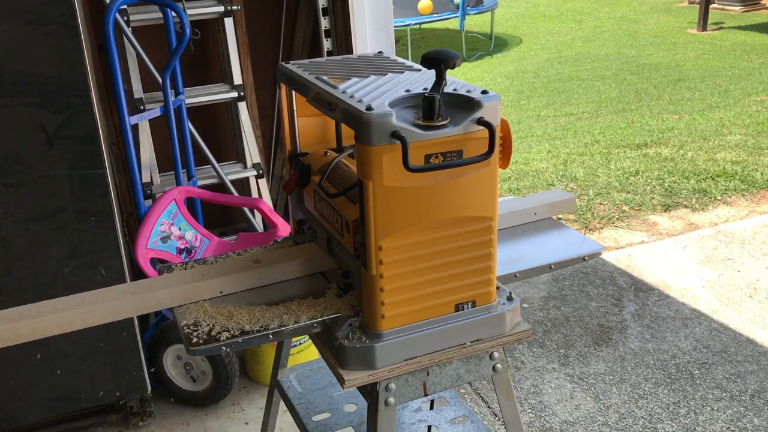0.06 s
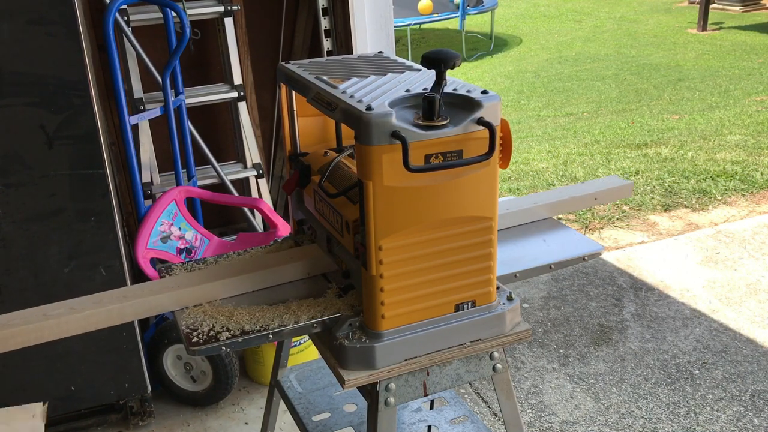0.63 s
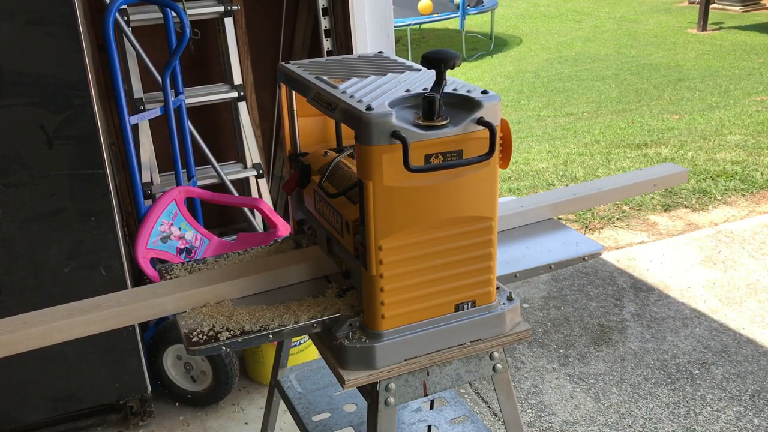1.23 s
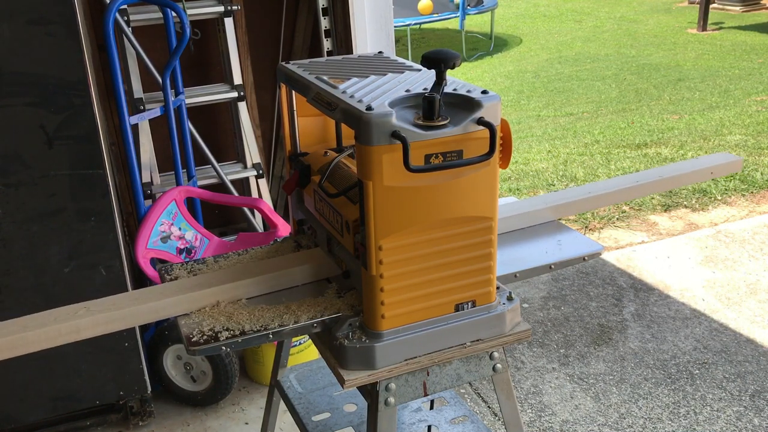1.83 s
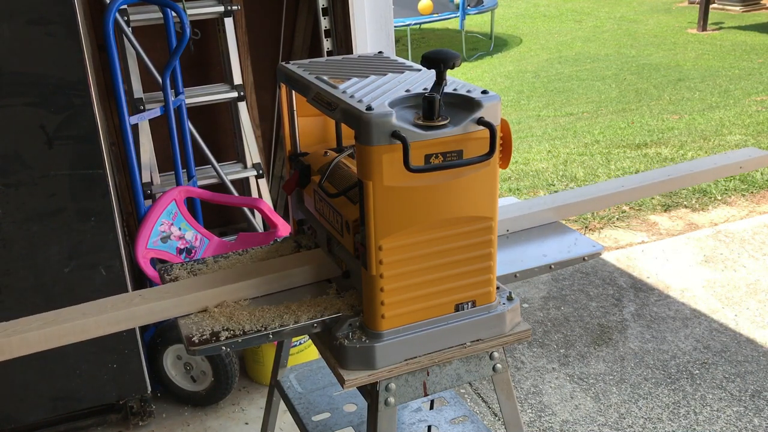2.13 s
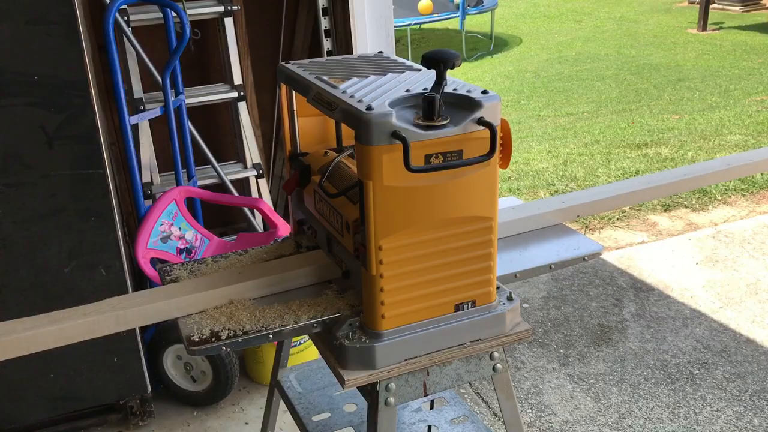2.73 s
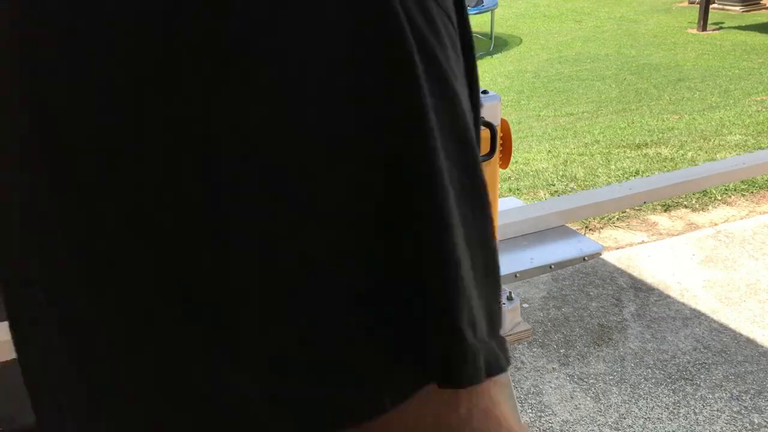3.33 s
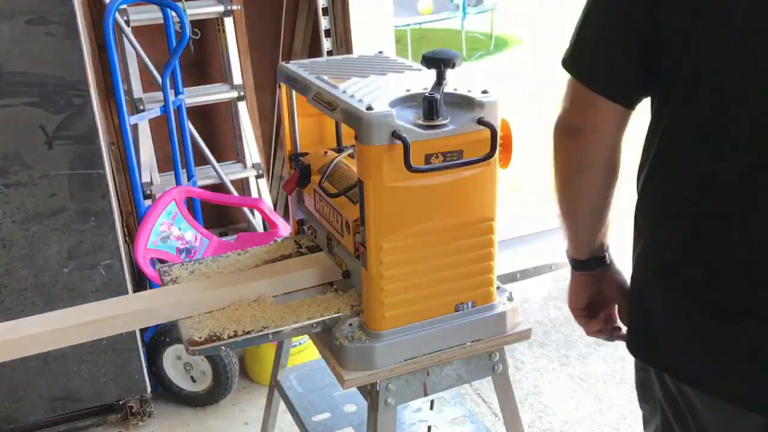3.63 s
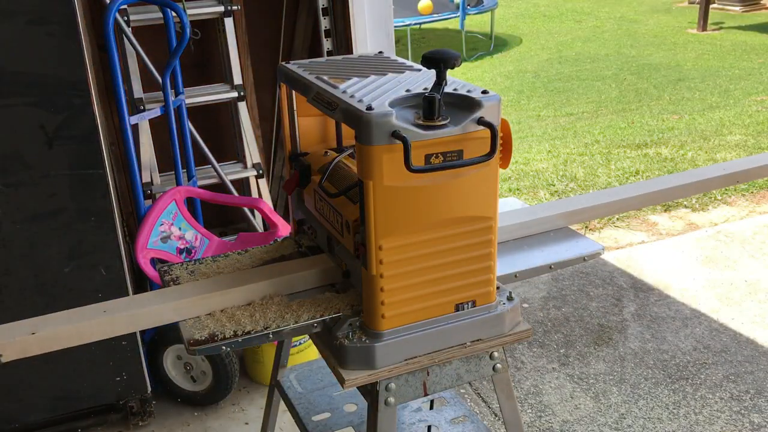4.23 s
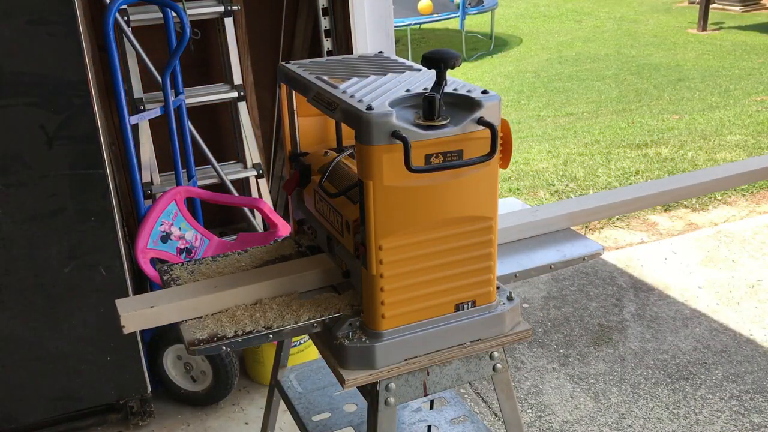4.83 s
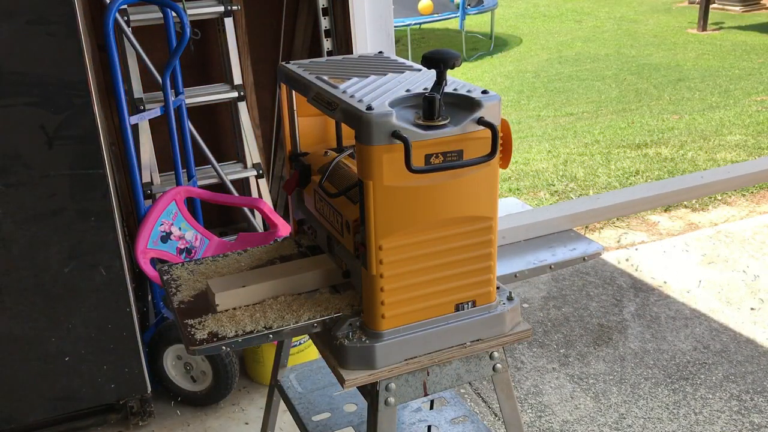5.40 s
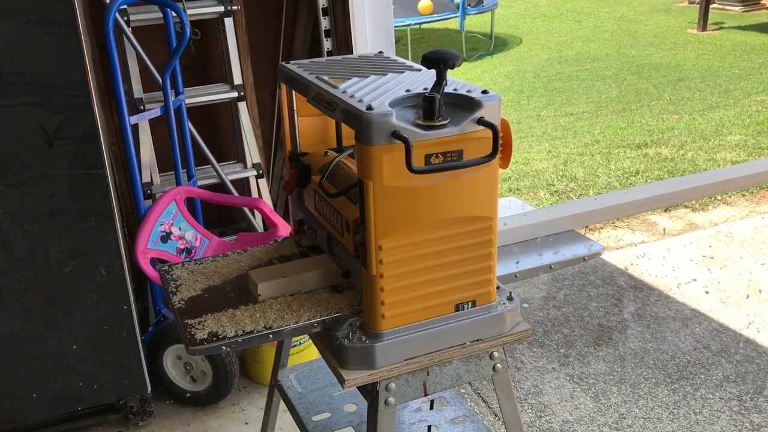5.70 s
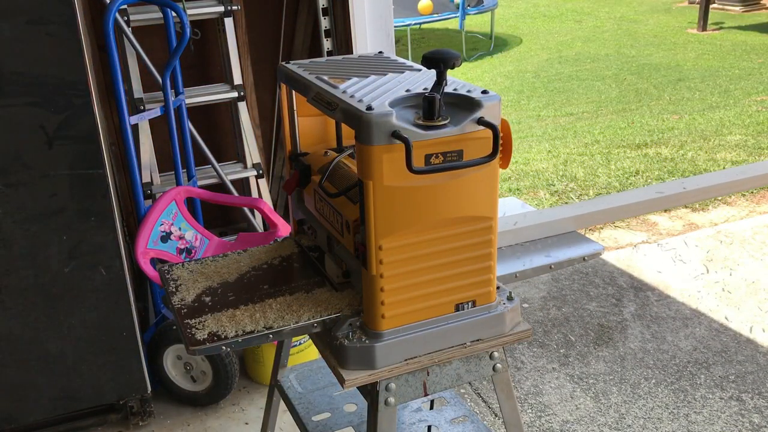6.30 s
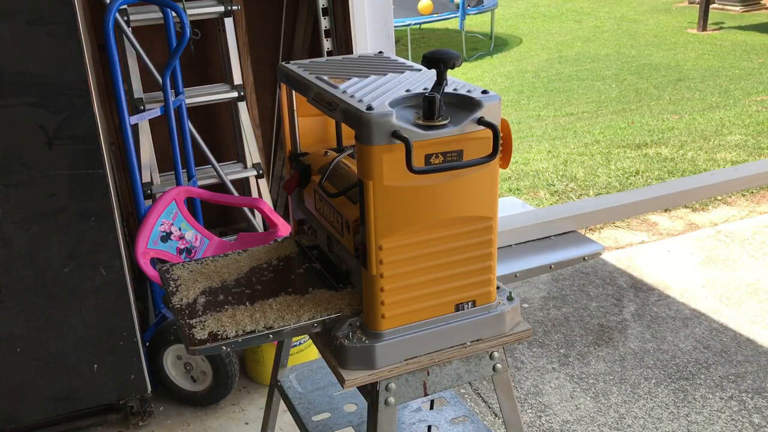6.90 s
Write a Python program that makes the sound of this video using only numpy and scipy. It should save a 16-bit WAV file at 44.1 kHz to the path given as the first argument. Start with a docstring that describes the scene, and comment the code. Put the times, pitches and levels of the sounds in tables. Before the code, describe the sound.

A benchtop planer is cutting a long wooden board from the start, heard from a fixed spot in an open garage with little echo. The knives make a loud, bright, pitched buzz over motor and gear whine, a throbbing drone, fan air and hissing chips. High screeches flare during the first second. The cut then runs fairly evenly, its pitch wavering slightly and brief squeals coming and going, with a sharp one at about 3.6 seconds. From around 4.8 seconds the motor sags under load, reaching its lowest pitch near 6 seconds, while the cut chatters and screeches more strongly. The pitch begins to recover at about 6.3 seconds. At 6.9 seconds the board leaves the knives and the cutting buzz stops dead. For the last moment the motor speeds up, whistling over rushing air and a thinner hiss.

```python
"""A benchtop thickness planer cuts a long board in an open garage.
The knives strike the wood about 430 times a second and the motor sags under the load; as the board
travels, its resonances pick out single knife harmonics and squeal. Chips, fan air, motor and feed gears
fill in the rest. When the board leaves the knives, the cut stops dead and the motor speeds up."""
import sys
import numpy as np
from scipy import signal
from scipy.fft import rfft, irfft
from scipy.io import wavfile
from scipy.ndimage import uniform_filter1d

SR = 44100
rng = np.random.default_rng(int(sys.argv[2]) if len(sys.argv) > 2 else 0)


def master_out(mix):
    """Clip the mix to full scale and print it as 16-bit PCM to the path in sys.argv[1]."""
    frames = np.transpose(np.atleast_2d(mix))
    ceiling = np.clip(frames, -1, 1)
    pcm = np.round(ceiling * 32767).astype(np.int16)
    wavfile.write(sys.argv[1], SR, pcm)


N = 315315
T = np.arange(N) / SR
CUT_END_S = 6.871  # the board leaves the knives


def amp(db):
    """Decibels to gain."""
    return 10 ** (np.asarray(db) / 20)


def unit(x):
    """Scales to an rms of 1."""
    return x / np.sqrt(np.mean(abs(x) ** 2) + 1e-20)


def tone(turns):
    """A sine of rms 1."""
    return np.sqrt(2) * np.cos(2 * np.pi * turns)


def bell(x, centre, half_width):
    """A smooth swell of height 1."""
    return np.exp(-((x - centre) / half_width) ** 2)


def peak(hz, centre_hz, width_hz):
    """Power response of a resonance, 1 at its centre."""
    return 1 / (1 + (2 * (hz - centre_hz) / width_hz) ** 2)


def wander(rate_hz, size=4096):
    """A random drift of rms 1, rolled off above the given rate."""
    hz = np.fft.rfftfreq(size, T[-1] / size)
    slow = irfft(rfft(rng.standard_normal(size)) / (1 + (hz / rate_hz) ** 2))
    return np.interp(T, np.linspace(0, T[-1], size), unit(slow))


def whine(partials, turns, waver_db, waver_hz):
    """Whole multiples of a rotation, each wavering in level."""
    return sum(amp(db + waver_db * wander(waver_hz)) * tone(round(k) * turns + rng.random())
               for k, db in partials)


def flicker(x, depth_db, size=256):
    """The level flickers in small patches of time and frequency."""
    spectra = signal.stft(x, nperseg=size)[2]
    patches = uniform_filter1d(rng.standard_normal(spectra.shape), size=4, axis=0)
    patches = uniform_filter1d(patches, size=14, axis=1)
    return signal.istft(spectra * amp(depth_db * unit(patches)), nperseg=size)[1][:N]


def housed(noise, colour):
    """Gives noise its own colour and the resonances of the housing."""
    # Hollows of the housing. Each row: centre in Hz, width in Hz, boost in dB.
    hollows = [(159, 30, 8), (305, 17, 13), (1420, 160, 4.5), (1960, 310, 6.5), (3057, 340, 6),
               (4240, 460, 4.5), (9130, 750, 8.5)]
    hz = np.fft.rfftfreq(N, 1 / SR)
    colour_hz, colour_db = np.transpose(colour)
    db = np.interp(np.log(hz + 1), np.log(colour_hz), colour_db, left=-150, right=-150)
    db += sum(boost * peak(hz, centre, width) for centre, width, boost in hollows)
    return unit(irfft(rfft(noise) * amp(db), N))


def knives(turns, rate_hz, load, pivot_harmonic=11.77):
    """The buzz of knife strikes: load and frame colour it, the passing grain swells and roughens it."""
    # Knives in the wood. Each entry: base level in dB of harmonic 3, 4, 5, .. of the strike rate.
    harmonics = [-33, -46.5, -34.5, -35.5, -37.5, -37.5, -31.5, -37, -37.5, -30, -35.5, -36.5, -29.5, -31.5,
                 -29, -31, -33, -32.5, -31, -33.5, -32.5, -30.5, -33.5, -35.5, -35, -34, -40.5, -33.5, -35,
                 -44, -34, -49, -49, -35]
    # Frame resonances the harmonics sweep through. Each row: centre in Hz, width in Hz, boost in dB.
    frame = [(1275, 72, 4), (1534, 89, 16.5), (1749, 120, 16), (2032, 140, 6.5), (2350, 100, 3.5),
             (2628, 32, 6.5), (3083, 170, 5.5), (3598, 97, 12.5), (4220, 97, 6), (4550, 94, 3.5)]
    # Hard grain makes a whole band screech. Each row: peak time in seconds, half length in seconds,
    # centre in Hz, half width in Hz, boost in dB.
    screeches = [(0.278, 0.24, 8370, 1690, 9.5), (0.662, 0.17, 9440, 610, 9.5), (1.023, 0.1, 4700, 1280, 8),
                 (1.88, 0.24, 8500, 3040, 1), (2.703, 0.46, 4450, 1100, 0.5), (4.007, 0.079, 8200, 1336, 4),
                 (4.955, 0.21, 8150, 3140, 6), (5.51, 0.3, 9200, 3020, 7.5), (6.283, 0.19, 5870, 1310, 12),
                 (6.742, 0.23, 3950, 1800, 7.5)]
    swells = [(db * bell(T, s, length), hz, width) for s, length, hz, width, db in screeches]
    buzz = np.zeros(N)
    for k, base_db in enumerate(harmonics, 3):
        hz, octaves = k * rate_hz, np.log2(k / pivot_harmonic)
        chatters = k % 3 == 0
        db = base_db - 1.18 + 0.73 * octaves - 1.0 * chatters
        db += load * (-4.5 - 3.0 * octaves + 4.5 * chatters)  # a labouring cut drops, dulls and chatters
        db += sum(boost * peak(hz, centre, width) for centre, width, boost in frame)
        for swell_db, centre, width in swells:  # a screech starves the band two octaves below it
            db += swell_db * (bell(hz, centre, width) - 0.61 * bell(hz, centre / 4, width / 8))
        grain = np.sqrt(min(k / pivot_harmonic, 2))  # higher harmonics feel the grain most
        level = amp(db + 3.0 * grain * wander(rate_hz=6)) + squeal(k)
        roughness = 0.2 * grain * wander(rate_hz=35) / (2 * np.pi)
        buzz += level * tone(k * turns + roughness + rng.random())
    return buzz * amp(0.72 * wander(rate_hz=46))  # the board shudders under the rollers


def squeal(k):
    """Added level of harmonic k as a resonance of the moving board drifts into step and out again."""
    # The board's squeals. Each row: peak time in seconds, half length in seconds, harmonic, level in dB.
    squeals = [(0.068, 0.1, 24, -28), (0.37, 0.18, 14, -25), (0.457, 0.15, 12, -32),
               (0.479, 0.095, 18, -22.5), (0.575, 0.1, 8, -26.5), (0.908, 0.11, 6, -27),
               (1.042, 0.092, 18, -22), (1.623, 0.21, 6, -27.5), (2.035, 0.23, 19, -25),
               (2.622, 0.087, 21, -23.5), (2.84, 0.079, 19, -23), (2.95, 0.57, 6, -30.5),
               (3.387, 0.096, 15, -30), (3.596, 0.079, 12, -27), (3.647, 0.054, 21, -13),
               (3.73, 0.044, 24, -24), (3.811, 0.12, 6, -30), (4.352, 0.16, 6, -26.5),
               (4.87, 0.085, 3, -27), (4.923, 0.28, 21, -26), (4.98, 0.041, 15, -23), (5.023, 0.05, 9, -25),
               (5.12, 0.15, 18, -17.5), (5.547, 0.21, 18, -21), (5.696, 0.16, 21, -17.5),
               (5.956, 0.12, 15, -20), (6.042, 0.092, 9, -25), (6.34, 0.46, 3, -22.5),
               (6.39, 0.15, 21, -27), (6.788, 0.12, 12, -24.5), (6.814, 0.11, 15, -21)]
    swells = [amp(db) * bell(T, s, length) for s, length, order, db in squeals if round(order) == k]
    return sum(swells) * amp(1.85 * wander(rate_hz=10))


def chips(turns, cutting, burst_turns=0.46):
    """Each strike tears off a short spray of chips; a thinner hiss stays when the cut ends."""
    # Colour of the chip spray. Each row: frequency in Hz, relative level in dB.
    colour = [(2350, -45), (4000, -4.5), (4410, -8), (7470, -2), (9240, -2.5), (10900, -2.5), (13900, -0.5),
              (15700, -5)]
    bursts = 1 + 0.68 * np.exp(-(turns % 1) / burst_turns)
    spray = cutting * bursts + (1 - cutting) * amp(-1.5)
    return amp(-22) * flicker(housed(spray * rng.standard_normal(N), colour), depth_db=0.8)


def fan_air():
    """Air rushing through the housing."""
    # Colour of the fan air. Each row: frequency in Hz, relative level in dB.
    colour = [(18, -102), (30, -75), (163, -24), (303, -27.5), (352, -15.5), (485, -20.5), (640, -17),
              (793, -10.5), (846, -7), (1030, -7), (1270, -3), (1610, -11), (2990, -5), (3330, -8.5),
              (5000, -8.5), (6500, -9), (11000, -120)]
    return amp(-25) * flicker(housed(rng.standard_normal(N), colour), depth_db=0.9)


def background_db(load, opening_s=1.1, heavy_load=0.39):
    """Air, hum, whine and chips sound quieter during the opening screech and the heavy part of the cut."""
    heavy = 0.5 + 0.5 * np.tanh((load - heavy_load) / 0.08)
    return -0.4 - load - 4.5 * heavy - 4 * bell(T, 0, opening_s)


def hum():
    """A faint hum, steady in pitch and wavering in level."""
    # Tones of the hum. Each row: frequency in Hz, relative level in dB.
    tones = [(177.6, -59), (301.5, -62.5), (360.7, -49.5), (721.4, -50)]
    return sum(amp(db + 2.5 + wander(rate_hz=4)) * tone(hz * T + rng.random()) for hz, db in tones)


def motor_shaft(turns, rate_hz, in_step_s=0.0832):
    """The motor turns just below the strike rate; the two draw closer as the speed sags."""
    lag_hz = 0.00829 * rate_hz * (rate_hz / 435) ** 3.5
    lag = np.cumsum(lag_hz) / SR
    return turns - lag + np.interp(in_step_s, T, lag)


def drive(shaft):
    """Whine of the motor and of the gears that turn the feed rollers."""
    # Motor whine. Each row: multiple of the shaft rate (7 pinion, 24 commutator), relative level in dB.
    motor_partials = [(1, -48.5), (7, -36.5), (14, -43), (20, -68), (21, -36.5), (24, -33), (26, -49),
                      (28, -57), (32, -40)]
    # Second stage of the feed gears. Each row: multiple of its mesh rate, relative level in dB.
    gear_partials = [(3, -38.5), (4, -38), (5, -34.5), (6, -38), (7, -49), (10, -56), (11, -49), (13, -53)]
    mesh = shaft * 7 / 24 * 7
    motor = whine(motor_partials, shaft, waver_db=1.0, waver_hz=2.8)
    gears = whine(gear_partials, mesh, waver_db=4.0, waver_hz=4.4)
    return motor + amp(-1) * gears


def drone(turns, shaft, motor_share=0.71):
    """Second harmonics of motor and knives throb about seven times a second, slower under load."""
    # Housing resonances that carry the drone. Each row: centre in Hz, width in Hz, level in dB.
    modes = [(854.2, 14.9, -27), (783.5, 12.5, -35), (754, 11, -38)]
    hz = 2 * np.gradient(shaft) * SR
    level = np.sqrt(sum(amp(db) ** 2 * peak(hz, centre, width) for centre, width, db in modes))
    return level * (np.sqrt(motor_share) * tone(2 * shaft) + np.sqrt(1 - motor_share) * tone(2 * turns))


def panel(shaft, panel_hz=2525, width_hz=35):
    """A cover panel rings when the sagging motor's sixth harmonic passes its resonance."""
    sixth = 6 * shaft
    response = np.sqrt(peak(np.gradient(sixth) * SR, panel_hz, width_hz))
    return amp(-30 + 3.3 * wander(rate_hz=14)) * response * tone(sixth)


def brief_dip(dip_s=4.3, half_length_s=0.065, depth_db=-2):
    """The cutting sound drops slightly for a moment."""
    return amp(depth_db * bell(T, dip_s, half_length_s))


def free_run(turns, shaft):
    """With the board gone, the bare cutterhead whistles and the commutator stands out."""
    whistle = amp(-23 + 3 * wander(rate_hz=25)) * tone(6 * turns)
    commutator = amp(-32 + 3 * wander(rate_hz=25)) * tone(24 * shaft)
    return whistle + commutator


def gain_recovery(cutting, depth_db=-5.5, recover_s=0.13):
    """The gain is low as the loud cut stops, then comes back up."""
    return amp(depth_db * (1 - cutting) * bell(T, CUT_END_S, recover_s))


def garage(x, wet_db=-15, t60_s=0.44, echoes_per_s=2000):
    """A short, thin tail: most sound leaves by the open door."""
    t = T[:SR // 2]
    echoes = rng.standard_normal(len(t)) * (rng.random(len(t)) < echoes_per_s / SR) * (t > 0.004)
    tail = unit(echoes * amp(-60 * t / t60_s)) / np.sqrt(len(t))
    return x + amp(wet_db) * signal.fftconvolve(x, tail)[:N]


def scene(easy_hz=435, labouring_hz=380, jitter_hz=0.191, stop_s=0.002):
    """One rotation drives the cut, the motor and the gears; the deeper its sag, the heavier the load."""
    # Speed of the cutterhead. Each row: time in seconds, knife strikes per second.
    speeds = [(0.0, 429.3), (0.1, 427.7), (0.42, 428.8), (0.78, 437.3), (1.93, 432.3), (2.35, 423.8),
              (2.49, 422), (3.05, 426.2), (3.7, 440.7), (3.96, 433.8), (4.4, 436.8), (4.82, 423),
              (5.3, 401.6), (5.59, 383.4), (5.99, 379.2), (6.23, 381.2), (6.43, 391), (6.73, 397.6),
              (6.89, 406.3), (6.95, 420.4), (7.07, 444), (7.15, 449)]
    speed_hz = np.interp(T, *np.transpose(speeds))
    load = (easy_hz - speed_hz) / (easy_hz - labouring_hz)
    rate_hz = speed_hz + jitter_hz * wander(rate_hz=8.7)
    turns = np.cumsum(rate_hz) / SR  # one turn of phase per strike
    shaft = motor_shaft(turns, rate_hz)
    cutting = 0.5 - 0.5 * np.tanh((T - CUT_END_S) / stop_s)
    feeding = 0.5 + 0.5 * cutting  # the drive sings less with nothing to feed
    duck_db = background_db(load)
    machine = hum() + fan_air() + feeding * drive(shaft) + panel(shaft)
    machine += (1 - cutting) * free_run(turns, shaft)
    machine = amp(duck_db) * machine + drone(turns, shaft)
    wood = cutting * knives(turns, rate_hz, load) + amp(0.87 * duck_db) * chips(turns, cutting)
    mono = garage(brief_dip() * wood + gain_recovery(cutting) * machine)
    return np.array([mono, mono])


def record(dry, edge_hz=15740):
    """A steep low-pass trims the very top."""
    low_pass = signal.firwin(1023, edge_hz, window=("kaiser", 9), fs=SR)
    return signal.oaconvolve(dry, low_pass[None], "same")


dry = scene()
out = record(dry)
master_out(out)
```